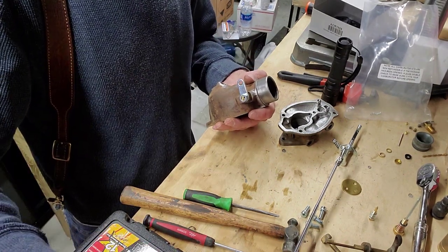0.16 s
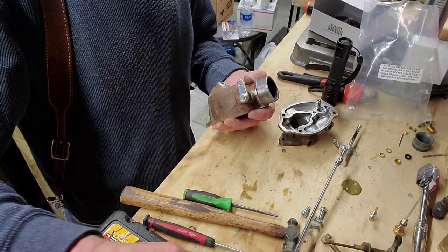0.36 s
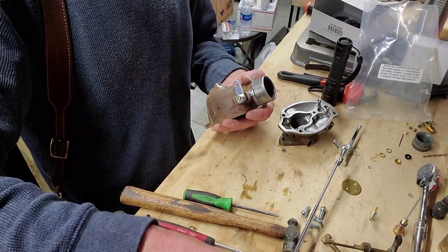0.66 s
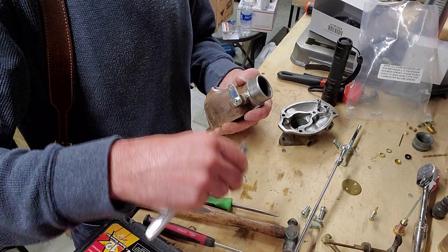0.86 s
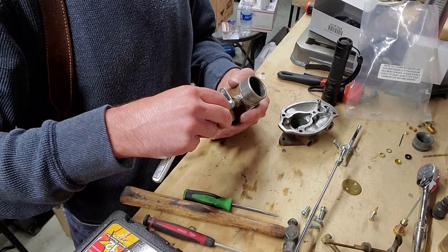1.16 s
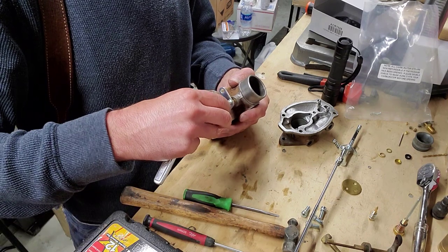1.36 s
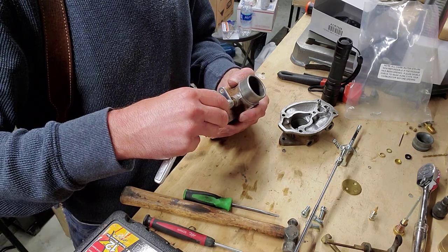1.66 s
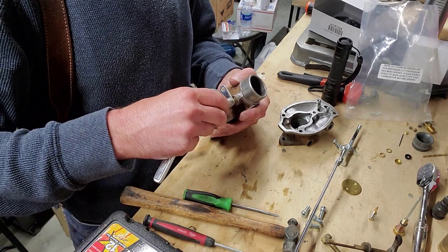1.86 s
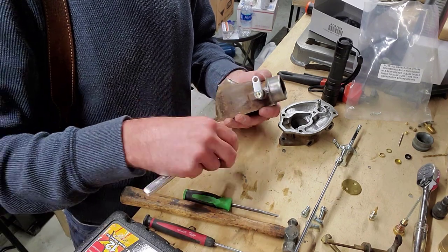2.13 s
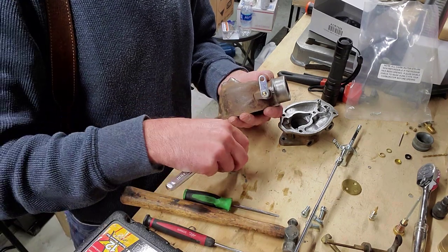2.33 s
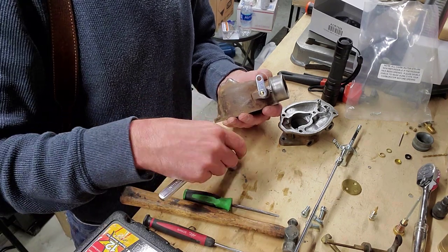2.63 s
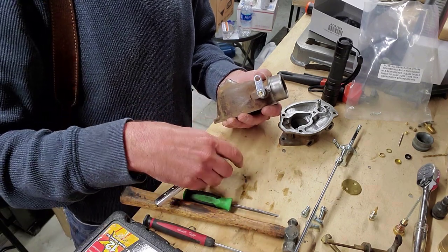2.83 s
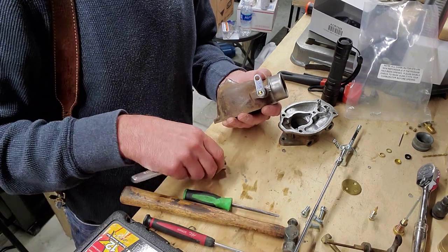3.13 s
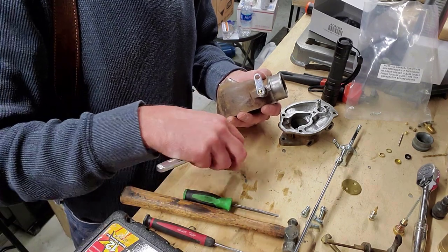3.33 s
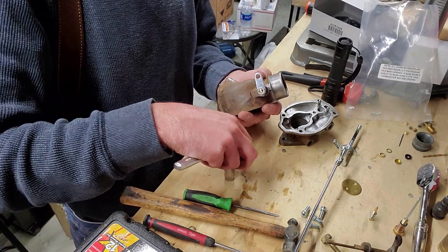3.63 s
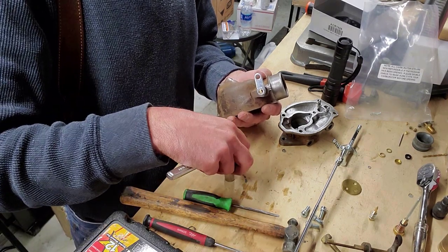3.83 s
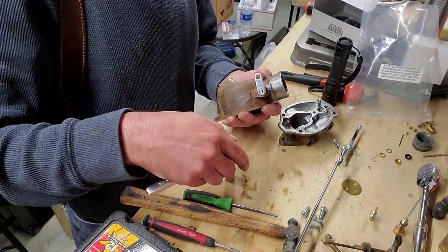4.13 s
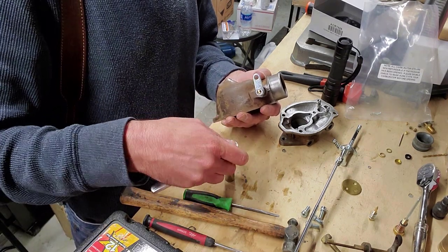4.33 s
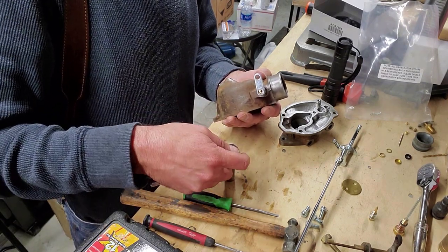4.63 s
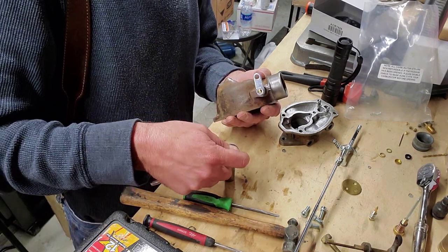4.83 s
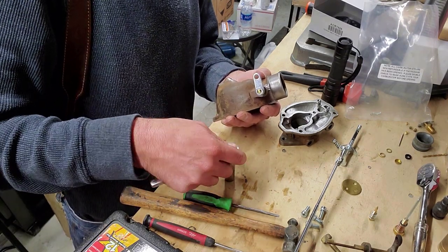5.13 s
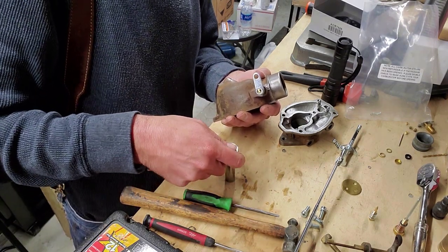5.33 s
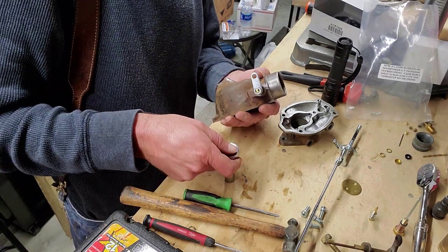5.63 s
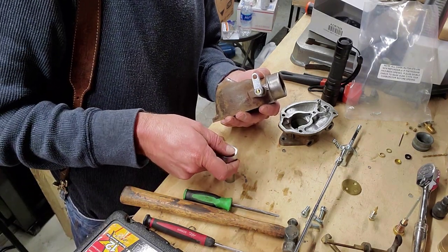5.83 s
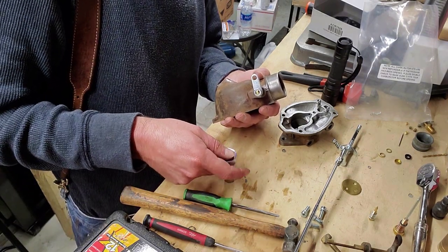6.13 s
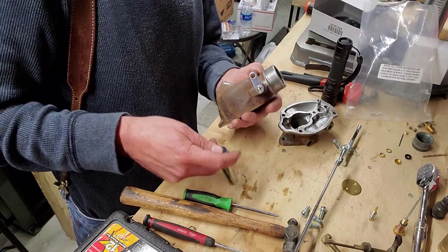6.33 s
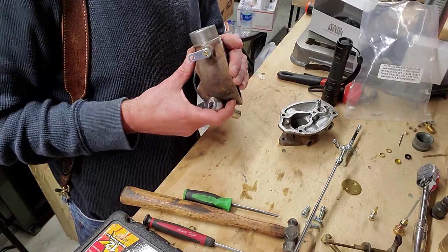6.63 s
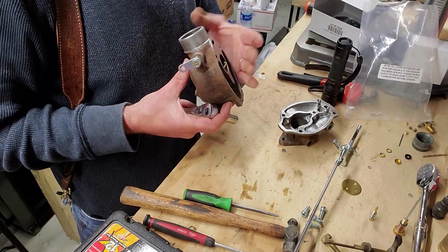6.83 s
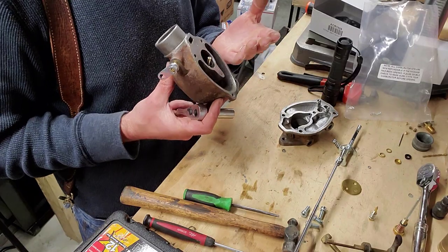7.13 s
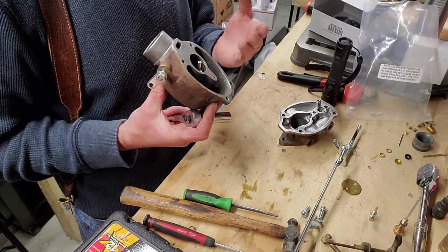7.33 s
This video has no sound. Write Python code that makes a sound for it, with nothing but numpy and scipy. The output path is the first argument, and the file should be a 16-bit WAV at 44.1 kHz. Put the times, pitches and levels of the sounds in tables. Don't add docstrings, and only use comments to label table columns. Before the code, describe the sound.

Loud plastic and metal knocks, tiny steel ticks, then a ratchet clattering onto a wooden bench, over a faint motor hum and airy room noise.

```python
import sys
import numpy as np
from scipy import signal
from scipy.fft import rfft, irfft, next_fast_len
from scipy.io import wavfile
from scipy.ndimage import map_coordinates

SR = 44100
rng = np.random.default_rng(int(sys.argv[2]) if len(sys.argv) > 2 else 0)


def how_loud(loudness_db):
    steps = np.asarray(loudness_db, float) / 20
    return 10 ** steps


def int16_out(signal):
    q = np.round(np.clip(np.atleast_2d(signal).T, -1, 1) * 32767)
    wavfile.write(sys.argv[1], SR, q.astype(np.int16))


N = 329427

EDGES = 27.2 * 2 ** np.arange(0, 9.4, 1 / 3)
# f/Hz, density/dB per Hz
BENCH_WOOD_CRACK = [(60, -35), (300, -12.5), (600, 4), (880, 0), (1250, -12.5), (2200, -23), (4000, -34),
                    (9000, -60.5), (16000, -88.5)]
# f/Hz, density/dB per Hz
STEEL_ON_STEEL_CRACK = [(300, -40), (800, -6), (2000, 1), (3100, -2.5), (4100, -3), (5900, -6), (7600, -9),
                        (10000, -18), (13500, -11), (16000, -28.5)]
# f/Hz, density/dB per Hz
CAST_METAL_CRACK = [(300, -32), (700, -11), (2300, -7), (2980, -15), (3900, -4.5), (5800, -6.5),
                    (7100, -18.5), (13500, -34.5), (16000, -49)]


def at_hz(points, hz):
    table_hz, value = np.transpose(points)
    return np.interp(np.log(hz), np.log(table_hz), value)


def rms_one(x):
    return x / np.sqrt(np.mean(x ** 2) + 1e-20)


def drift(rate):
    knots = rng.standard_normal(400)
    coarse = np.arange(0, N + 64, 64)
    smooth = map_coordinates(knots, [coarse / SR * rate], order=3, mode="mirror")
    return np.interp(np.arange(N), coarse, smooth)


def band(x, low, high, order=2):
    return signal.sosfilt(signal.butter(order, [low, high], "band", fs=SR, output="sos"), x)


def causal_filter(points, tilt_db, size):
    hz = np.maximum(np.arange(size // 2 + 1) * SR / size, 20)
    level = how_loud(at_hz(points, hz))
    tilt = how_loud(tilt_db * np.log2(hz / 1500))
    cepstrum = irfft(np.log(level * tilt / np.sqrt(np.mean(level ** 2))), size)
    cepstrum[1:size // 2] *= 2
    return np.exp(rfft(cepstrum[:size // 2], size))


def struck(hits, modes, crack, ring_db, crack_db, punch_db, contact_s):
    # f/Hz, t60/s
    clatter_t60 = [(100, 0.13), (1000, 0.077), (10000, 0.061)]
    # f/Hz, t60/s
    room_t60 = [(100, 0.66), (500, 0.39), (2000, 0.54), (5000, 0.48), (8000, 0.36), (14000, .15)]
    wobble_depth_db, wobble_grows_s = 4.5, 0.024
    out, t = np.zeros(N + SR), np.arange(2 ** 14) / SR
    low, high = EDGES[2:-2:2], EDGES[4::2]
    centres = np.sqrt(low * high)
    bank = [signal.butter(3, edges, "band", fs=SR, output="sos") for edges in zip(low, high)]
    hz, mode_db, t60 = np.transpose(modes)[:, :, None]
    rise = np.sin(np.pi / 2 * np.minimum(t / contact_s, 1)) ** 2
    swell = (1 - np.exp(-t / 0.0055)) * np.cos(np.pi / 2 * t / t[-1])
    for k, (s, peak_db, tilt_db, damping, room_db) in enumerate(hits):
        white = rng.standard_normal((2, len(t)))

        chance_db = rng.normal(0, 3.0, hz.shape) * (k > 0)
        gain = how_loud(mode_db + chance_db + tilt_db * np.log2(hz / 1500))
        direct = how_loud(-60 * t * damping / np.minimum(t60, .35))
        reflected = swell * how_loud(room_db - 11.5 - 60 * t / at_hz(room_t60, hz))
        knots = rng.standard_normal((len(hz), 40))
        uneven = np.array([np.interp(t, np.arange(40) / 100, row) for row in knots])
        wobble_db = wobble_depth_db * np.minimum(t / wobble_grows_s, 1) * uneven
        rings = gain * (direct + reflected) * how_loud(wobble_db) * np.sin(2 * np.pi * hz * t)
        ring = how_loud(ring_db) * rise * rings.sum(axis=0) / np.sqrt(np.sum(how_loud(mode_db) ** 2))

        lumps = how_loud(3.3 * np.interp(t, np.arange(150) / 300, rng.standard_normal(150)))
        clatter = np.zeros(len(t))
        for j, f in enumerate(centres):
            near = rise * lumps * how_loud(crack_db - 60 * t * damping / at_hz(clatter_t60, f))
            far = swell * how_loud(room_db - 60 * t / at_hz(room_t60, f))
            clatter += signal.sosfilt(bank[j], white[j % 2] * (near + far))

        colour = causal_filter(crack, tilt_db, size=len(t))
        coloured_clatter = irfft(colour * rfft(clatter))
        pulse = irfft(colour)
        punch = how_loud(punch_db) * pulse / np.abs(pulse).max()
        at = round(s * SR)
        out[at:at + len(t)] += how_loud(peak_db) * (coloured_clatter - ring - punch)
    return out[:N]


def noise_bursts(rows):
    out, t = np.zeros(N + SR), np.arange(SR // 5) / SR
    for s, peak_db, centre_hz, width_hz, t60 in rows:
        dying = rng.standard_normal(len(t)) * how_loud(-60 * t / t60)
        burst = band(dying, centre_hz - width_hz / 2, centre_hz + width_hz / 2, order=4)
        at = round(s * SR)
        out[at:at + len(t)] += how_loud(peak_db) * burst / np.abs(burst).max()
    return out[:N]


def gain_control_db():
    # t/s, cut/dB, hold/s
    ducks = [
        (0.324, 6.5, 1.06),
        (2.79, 5.5, 1.22),
        (5.962, 3.0, 1.16),
    ]
    fall_s, recover_db_per_s = .3, 8
    t, cut = np.arange(N) / SR, np.zeros(N)
    for s, cut_db, hold_s in ducks:
        corners = np.cumsum([s, fall_s, hold_s - fall_s, cut_db / recover_db_per_s])
        cut = np.maximum(cut, np.interp(t, corners, [0, cut_db, cut_db, 0]))
    return -cut


def jolted(steady_db, column, fall_db_per_s):
    # t/s, rumble/dB, wash/dB
    jolts = [(0.2, -39, -49), (0.35, -50, -32.5), (0.481, -64, -42.5), (1.2, -49, -66), (1.48, -64, -72),
             (1.69, -56, -60), (2.04, -65, -75), (2.35, -51, -72), (2.85, -42, -71), (3.4, -67, -74),
             (4.02, -68, -55.5), (4.58, -62, -68), (4.7, -54, -47.5), (5.62, -63, -70), (5.78, -42.5, -51),
             (6.02, -35, -37), (6.34, -67, -51), (7.37, -57, -59)]
    rise_db_per_s = 328
    t = np.arange(N // 64 + 2)[:, None] * 64 / SR
    s, peak_db = np.transpose(jolts)[[0, column]]
    away_db = np.where(t < s, rise_db_per_s * (s - t), fall_db_per_s * (t - s))
    power = np.sum(how_loud(peak_db - away_db) ** 2, axis=1)
    swell = np.interp(np.arange(N) / SR, t[:, 0], power)
    return np.sqrt(how_loud(steady_db) ** 2 + swell)


def air_and_motor():
    # f/Hz, density/dB per Hz
    air_colour = [(100, -12), (165, -20), (245, -0.5), (330, -3), (420, -8.5), (560, -2), (900, -6.5),
                  (1100, -9.5), (2500, -15.5), (2900, -21.5), (4800, -24.5), (6400, -32.5), (7200, -44),
                  (12400, -53), (12800, -85)]
    # f/Hz, level/dB against the air, width/Hz
    motor_tones = [(59.5, -19, 1.4), (125.5, -8, 1.7), (248.8, -9.5, 8.8), (513, -9, 7.84), (600, -20, 10)]
    white, together, air = rng.standard_normal((2, N + SR)), drift(3.03), np.zeros(N)
    size = next_fast_len(N + SR, True)
    hz = np.maximum(np.arange(size // 2 + 1) * SR / size, 20)
    rush = irfft(rfft(white, size) * how_loud(at_hz(air_colour, hz)), size)[:, :N + SR]
    for k, (low, high) in enumerate(zip(EDGES[5:-2], EDGES[6:])):
        flicker_db = .5 * together + .8 * drift(9.0)
        air += how_loud(flicker_db) * band(rush[k % 2], low, min(high, 12300), order=3)[SR:]
    air = rms_one(air)
    for tone_hz, tone_db, width_hz in motor_tones:
        wander = np.cumsum(rng.standard_normal(N)) * np.sqrt(2 * np.pi * width_hz / SR)
        air += how_loud(tone_db) * np.sin(2 * np.pi * tone_hz * np.arange(N) / SR + wander)
    return jolted(-48.5 + gain_control_db(), column=2, fall_db_per_s=141) * air


def bench_rumble():
    rumble = rms_one(band(rng.standard_normal(N + SR), 61, 110)[SR:])
    return jolted(-71 + gain_control_db(), column=1, fall_db_per_s=192) * how_loud(-3.5) * rumble


def fidgets():
    # t/s, peak/dB, centre/Hz, width/Hz, t60/s
    shifts = [(0.0, -48.5, 3970, 4040, 0.051), (0.053, -40.5, 4850, 2500, 0.08),
              (0.054, -57, 11600, 7000, .06), (0.109, -45, 5400, 900, .06), (1.427, -56, 6200, 600, 0.036),
              (1.905, -56, 5700, 900, 0.067), (2.8452, -24, 10500, 12000, 0.004),
              (3.1932, -28.5, 4500, 1300, 0.0029), (3.1932, -46, 6300, 1300, 0.039),
              (3.1932, -51, 9500, 3500, 0.019), (3.399, -58, 5000, 2500, 0.04),
              (3.719, -50, 4370, 1980, 0.037), (4.661, -41, 4130, 1200, 0.04),
              (4.6965, -39, 4700, 3800, 0.016), (4.908, -47, 3450, 3900, 0.03),
              (5.577, -48, 3000, 3000, 0.04), (5.762, -33, 5300, 700, 0.015),
              (5.762, -43.5, 8600, 9000, 0.13), (5.763, -24, 1360, 900, 0.056),
              (5.78, -45, 4700, 1500, .05), (5.989, -53, 4500, 6000, .04), (6.279, -47, 4500, 3550, 0.028),
              (6.288, -52, 6000, 3520, 0.079), (6.297, -48, 6200, 900, 0.059)]
    return noise_bursts(shifts)


def tray_knocks():
    # t/s, peak/dB, tilt/dB per octave, damping/factor, room/dB
    hits = [
        (0.1548, 1, -1.5, 0.85, -30.5),
        (0.1595, -0.5, -0.2, 1.27, -36),
        (0.177, -10, -1, 1.5, -29),
        (0.194, -8, -1.5, 1.6, -22.5),
        (0.511, -23.5, -4, 0.93, -34.5),
        (0.648, -25, 0, 1.15, -42),
    ]
    # f/Hz, level/dB, t60/s
    modes = [(240, -4.5, 0.15), (343, -20.5, 0.09), (449, -23, 0.34), (530, -7, 0.038), (637, 11.5, 0.024),
             (860, 5.5, 0.046), (970, -6, 0.19), (1340, 4, 0.055), (1750, -3.5, 0.04), (3400, -21, 0.035),
             (6960, -51.5, .15)]
    # f/Hz, density/dB per Hz
    crack = [(60, -45.5), (230, -13.5), (600, 1.5), (1300, -3), (1900, -12), (2600, -25), (4000, -29),
             (7000, -48.5), (11000, -60.5), (16000, -73)]
    return struck(hits, modes, crack, -7.0, -12.5, -3.5, contact_s=0.00062)


def more_fidgets():
    # t/s, peak/dB, centre/Hz, width/Hz, t60/s
    more_shifts = [(0.17, -41.5, 4500, 7000, 0.12), (6.6862, -29, 1170, 1300, 0.01),
                   (5.775, -41, 5500, 4000, 0.03), (1.7095, -45, 2500, 3800, 0.015),
                   (6.6405, -43, 14200, 2500, 0.03), (0.313, -37.5, 12000, 5500, 0.029),
                   (5.763, -42, 6800, 900, 0.03), (6.641, -24.5, 1520, 2100, 0.009),
                   (3.195, -39, 4700, 1700, 0.045), (3.197, -53.5, 8600, 2000, 0.08),
                   (4.661, -41, 5500, 1100, 0.033), (4.698, -40, 4300, 1500, 0.045),
                   (4.908, -39, 1200, 1400, 0.06), (5.998, -25, 1340, 1400, 0.07)]
    return noise_bursts(more_shifts)


def edge_clicks():
    # t/s, peak/dB, centre/Hz, width/Hz, t60/s
    clicks = [(2.7845, -32, 9500, 12000, .005), (2.7872, -34, 9500, 12000, .005),
              (2.8475, -42, 11000, 10000, .006), (0.34, -48, 5000, 6000, .01),
              (6.288, -45, 5500, 3500, .012), (6.29, -60, 9000, 4500, 0.11), (5.701, -40, 830, 1000, .04),
              (4.661, -42, 3800, 4500, 0.0074), (5.572, -40, 700, 810, .03), (5.598, -40, 700, 900, .02),
              (5.748, -36, 720, 900, .02), (0.272, -33.5, 1250, 400, .06), (1.006, -35.5, 920, 870, .02),
              (1.012, -41, 3100, 500, .07), (2.8452, -18, 5000, 5000, 0.0037),
              (6.687, -49, 7500, 5000, .03), (6.009, -20, 1100, 1800, .008)]
    return noise_bursts(clicks)


def latch_snap():
    # t/s, peak/dB, tilt/dB per octave, damping/factor, room/dB
    snap = [
        (0.313, 0, 0.64, 1.75, -22.5),
        (0.335, -10, 0.18, 0.68, -37),
        (0.354, -8, -1.2, 1.92, -24),
    ]
    # t/s, peak/dB, tilt/dB per octave, damping/factor, room/dB
    chatter = [
        (0.323, -13, -0.5, 0.81, -32),
        (0.3165, -6.5, 0, 2.3, -29.5),
    ]
    # f/Hz, level/dB, t60/s
    modes = [(250, -18.5, 0.13), (458, -2, 0.2), (525, 0.5, 0.029), (790, -3, 0.11), (1360, -6.5, 0.082),
             (1476, 5, 0.0795), (1849, -14, .06), (2330, -25, .08), (2600, -17.5, 0.031),
             (2540, -11, 0.025)]
    # f/Hz, density/dB per Hz
    crack = [(60, -40.5), (280, -4), (800, 4), (1500, 3.5), (2500, -1), (4500, -9), (7000, -24.5),
             (11000, -48), (16000, -50)]
    return (struck(snap, modes, crack, -9, -5.5, -3, contact_s=0.00035)
            + struck(chatter, modes, crack, -3.0, -5.5, -12.5, contact_s=0.00074))


def socket_seats():
    # t/s, peak/dB, tilt/dB per octave, damping/factor, room/dB
    seating = [
        (1.0068, -26, 1.27, 1.09, -35),
    ]
    # t/s, peak/dB, tilt/dB per octave, damping/factor, room/dB
    home = [
        (1.0105, -27, -1.5, 1.2, -41),
        (1.022, -37, -3, 1.4, -38),
    ]
    # f/Hz, level/dB, t60/s
    modes = [(900, -2, 0.016), (1873, -2.5, 0.043), (2280, -13, .09), (2720, -14, 0.066), (3020, -8, 0.083),
             (3160, 0.5, 0.077), (3500, -11, .065), (4613, -3.5, 0.055), (5146, -15, .06),
             (5770, 5.5, 0.035), (5970, -2, 0.045), (7380, 1.5, 0.042), (7407, -21, 0.28),
             (9020, -17.5, 0.11)]
    return (struck(seating, modes, STEEL_ON_STEEL_CRACK, 1.6, -10.5, -14.5, contact_s=0.0004)
            + struck(home, modes, STEEL_ON_STEEL_CRACK, 1.6, -12.5, -24, contact_s=0.0013))


def bolt_tick():
    # t/s, peak/dB, tilt/dB per octave, damping/factor, room/dB
    tick = [
        (1.2237, -27.5, 1.15, 1.52, -35),
    ]
    # f/Hz, level/dB, t60/s
    modes = [(1494, 0.5, 0.1), (2200, -12, .07), (3220, -3, 0.053), (4580, -2, 0.058), (5600, -4, 0.059),
             (5980, 2.5, 0.041), (6200, -3, 0.055), (7350, -10, .06), (9000, -14.5, 0.13),
             (10800, -24, .05)]
    return struck(tick, modes, STEEL_ON_STEEL_CRACK, -3.5, -24, -18, contact_s=0.00034)


def pawl():
    # t/s, peak/dB, tilt/dB per octave, damping/factor, room/dB
    ticks = [
        (1.4364, -43, 1.2, 1.2, -35),
        (1.444, -43, 1.1, 1.1, -31),
    ]
    slip = [
        (1.709, -39, 0.5, 1.1, -30),
    ]
    catch = [
        (1.7453, -36.5, 0.5, 0.95, -30),
        (1.7767, -44, 0, 1.4, -32),
        (1.7864, -45, 1.9, 1.3, -38),
    ]
    release = [
        (1.9157, -43, 0.5, 0.86, -33),
    ]
    # f/Hz, level/dB, t60/s
    loose = [(1500, 8, 0.04), (2270, 5, 0.033), (2940, -3, 0.03), (4550, -5, 0.03), (5650, 4, 0.035),
             (5970, 4, 0.03), (7270, -1, 0.025), (8980, -11, 0.03)]
    held = [(1510, 2, .03), (3350, -8, .025), (4520, -1, .03), (5600, 0, .025), (5990, 4, .035),
            (6660, 1, .03), (7310, -3, .03), (11400, -22, .03)]
    seated = [(1530, 5, 0.033), (2280, 4, .04), (2810, -1, .03), (4520, 3.5, 0.053), (5650, -3, .03),
              (5990, -2, .03), (6290, 1, .025), (7360, -4, .03), (9300, -20, .03)]
    free = [(1500, 9, 0.073), (4550, -2, .035), (5400, -6, .03), (6300, -6, .03), (7300, 3, .05),
            (7600, -4, .03), (10400, -22, .03)]
    return (struck(ticks, loose, CAST_METAL_CRACK, -2.5, -18.5, -20, contact_s=0.00083)
            + struck(slip, held, CAST_METAL_CRACK, -3.0, -18.0, -18, contact_s=0.0005)
            + struck(catch, seated, CAST_METAL_CRACK, -2.5, -16.0, -18, contact_s=0.0005)
            + struck(release, free, CAST_METAL_CRACK, -2.5, -18.5, -24, contact_s=0.003))


def socket_set_down():
    # t/s, peak/dB, tilt/dB per octave, damping/factor, room/dB
    landings = [
        (2.3266, -6, -0.26, 1.06, -29.5),
        (3.4705, -22.5, -1.8, 1.63, -29.5),
    ]
    # t/s, peak/dB, tilt/dB per octave, damping/factor, room/dB
    rocks = [
        (2.3395, -24.5, 0, 1.6, -38),
        (2.3565, -23.5, 0, 2.2, -40),
    ]
    # f/Hz, level/dB, t60/s
    modes = [(244, -13, 0.099), (311, -15.5, 0.1), (483, -23, 0.16), (572, -6, 0.11), (658, 3.5, 0.056),
             (763, -2, 0.056), (833, 9.5, 0.023), (940, -11.5, 0.094), (1064, -12, 0.088),
             (1220, -27, 0.07), (1460, -20, 0.04)]
    return (struck(landings, modes, BENCH_WOOD_CRACK, 2.9, -19.5, -11, contact_s=0.0023)
            + struck(rocks, modes, BENCH_WOOD_CRACK, 1.5, -17, -7, contact_s=0.0012))


def ratchet_drop():
    # t/s, peak/dB, tilt/dB per octave, damping/factor, room/dB
    drop = [
        (2.7845, 2, -0.5, 1.6, -29.5),
        (2.793, -4, 1, 1.26, -21),
        (2.8015, -8, -1, 1.5, -21),
        (2.812, -8.5, -4, 3, -20.5),
        (2.845, 1, 0, 1.36, -33),
        (2.8755, -8, -3.5, 1.5, -27),
        (2.897, -31.5, -8, 0.9, -22),
    ]
    # t/s, peak/dB, tilt/dB per octave, damping/factor, room/dB
    settles = [
        (2.820, -16, 0, 2.4, -29),
        (2.855, -10, -1, 1.9, -25.5),
        (2.893, -19, -4, 1.5, -35),
        (5.9945, -16.5, -4.5, 2.4, -40),
        (6.040, -21.5, -5.5, 1.1, -35),
    ]
    # f/Hz, level/dB, t60/s
    modes = [(459, 5.5, 0.072), (615, 13, 0.045), (722, -4, 0.1), (910, 3, 0.098), (1090, 1.5, 0.06),
             (1243, 3, 0.13), (1565, -7, 0.16), (1730, 13, 0.075), (1960, 2, 0.11), (2400, 4, 0.11),
             (3040, -20, 0.11), (3900, -3, .06)]
    # f/Hz, density/dB per Hz
    crack = [(60, -56), (250, -20.5), (600, -2.5), (1700, 0.5), (3000, -5), (5000, -13.5), (7000, -26.5),
             (9000, -39.5), (16000, -52.5)]
    return (struck(drop, modes, crack, -5.5, -10.5, -6.0, contact_s=0.00075)
            + struck(settles, modes, crack, -10.0, -12.0, -4.5, contact_s=0.00051))


def bench_knocks():
    # t/s, peak/dB, tilt/dB per octave, damping/factor, room/dB
    hits = [
        (4.6618, -15, 1.5, 1.6, -35),
        (4.6965, -25.5, -2, 1.2, -43),
        (4.7055, -31, -7, 2.6, -40),
        (4.9065, -25.5, 3.5, 2.5, -36),
        (5.5765, -26, 1.5, 1.2, -29),
        (5.701, -40, -6, 1.5, -30),
    ]
    # f/Hz, level/dB, t60/s
    modes = [(244, -17, 0.13), (314, -10.5, 0.09), (466, -21, 0.093), (580, -25, 0.26), (625, -30, 0.039),
             (700, 4.5, 0.018), (760, -23, 0.072), (884, -8, 0.099), (950, -13.5, 0.19), (1102, -18, 0.22),
             (1500, -17, 0.073)]
    return struck(hits, modes, BENCH_WOOD_CRACK, -1.5, -18, -7, contact_s=0.0012)


def handle_knocks():
    # t/s, peak/dB, tilt/dB per octave, damping/factor, room/dB
    hits = [
        (5.7515, -13, -2, 1.5, -31),
        (5.7625, -8.5, -1.5, 1.5, -31.5),
        (5.7715, -30, 2, 1.7, -31),
        (5.805, -27, -0.84, 2.2, -38),
    ]
    # t/s, peak/dB, tilt/dB per octave, damping/factor, room/dB
    rocks = [
        (5.777, -28, 0, 1.5, -32),
        (5.790, -29, 0, 1.5, -35),
    ]
    # f/Hz, level/dB, t60/s
    modes = [(294, -8.5, 0.093), (443, -2, 0.076), (620, -9, 0.2), (746, -1, 0.05), (890, 5, 0.036),
             (968, 0, 0.13), (1105, -3.5, 0.18), (1170, -7, 0.1), (1456, -5.5, 0.06), (1660, -9, 0.082),
             (1820, -20, 0.092)]
    return (struck(hits, modes, BENCH_WOOD_CRACK, -5.5, -17.5, -5.5, contact_s=0.0026)
            + struck(rocks, modes, BENCH_WOOD_CRACK, -1.5, -18, -12, contact_s=0.00057))


def ratchet_laid():
    # t/s, peak/dB, tilt/dB per octave, damping/factor, room/dB
    hits = [
        (5.9972, -1, -0.74, 0.95, -31),
        (6.0035, -13, 3, 3.6, -39),
        (6.009, -10, 1.5, 2.4, -29),
        (6.075, -31.5, -2.5, 1.2, -24),
        (6.12, -37.5, -4, 1.4, -31),
    ]
    # f/Hz, level/dB, t60/s
    modes = [(235, -7, 0.13), (285, -10.5, 0.079), (318, -19, 0.31), (400, -17.5, 0.32), (450, -22, 0.46),
             (600, 0.5, 0.05), (920, -12, 0.07), (1410, -8, 0.04), (1722, -1, 0.053), (3430, -18, 0.082),
             (3790, -23, 0.088), (6030, -26, 0.088), (8900, -30, 0.054), (11940, -37, .16)]
    # f/Hz, density/dB per Hz
    crack = [(60, -44), (170, -18), (600, 5.5), (1700, -5.5), (2400, -15.5), (4000, -21.5), (7000, -21),
             (12000, -27), (15500, -36), (17000, -71.5)]
    return struck(hits, modes, crack, -5, -8.5, 0, contact_s=0.0015)


def housing_taps():
    # t/s, peak/dB, tilt/dB per octave, damping/factor, room/dB
    tap = [
        (6.6405, -15.5, 0.6, 1.22, -35.5),
    ]
    # t/s, peak/dB, tilt/dB per octave, damping/factor, room/dB
    bounce = [
        (6.6868, -29, -1.5, 1.25, -36),
    ]
    # f/Hz, level/dB, t60/s
    modes = [(1044, -6, 0.025), (2137, -18, .05), (2967, 8, 0.071), (2995, 1, .075), (2982, -25, 0.35),
             (5800, -28, 0.29), (3800, -25, .06), (4400, -4.5, 0.049), (4624, -12, 0.06), (5530, -9, 0.05),
             (5760, -6, 0.051), (5860, -13, 0.038), (8500, -36, .05), (8995, -35, 0.059)]
    return (struck(tap, modes, CAST_METAL_CRACK, 3.1, -14.5, -7.0, contact_s=0.00031)
            + struck(bounce, modes, CAST_METAL_CRACK, 2.2, -19.0, -11.0, contact_s=0.0003))


def scene():
    shop = air_and_motor() + bench_rumble()
    small_parts = fidgets() + more_fidgets() + edge_clicks()
    tray = tray_knocks() + latch_snap()
    steel = socket_seats() + bolt_tick() + pawl() + housing_taps()
    bench = socket_set_down() + ratchet_drop() + bench_knocks() + handle_knocks() + ratchet_laid()
    return (shop + small_parts + tray + steel + bench)[None]


def roll_off(x):
    return signal.sosfilt(signal.butter(12, 16510, fs=SR, output="sos"), x)


def record(dry):
    top, bass_cut_hz, treble_cut_hz = .88, 55, 17200
    rounded = dry / (1 + (dry / top) ** 4) ** (1 / 4)
    thin = signal.sosfilt(signal.butter(3, bass_cut_hz, "high", fs=SR, output="sos"), rounded)
    mix = signal.sosfilt(signal.cheby2(10, 60, treble_cut_hz, fs=SR, output="sos"), thin)
    return roll_off(mix)


dry = scene()
out = record(dry)
int16_out(out)
```